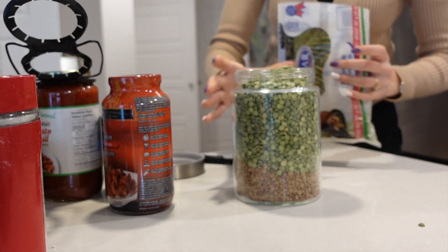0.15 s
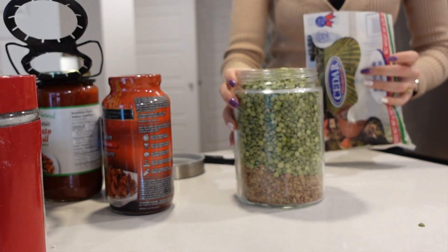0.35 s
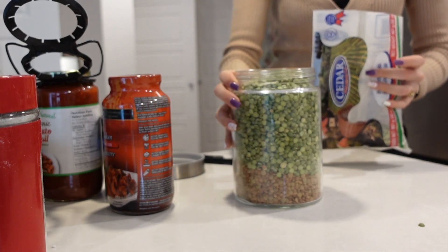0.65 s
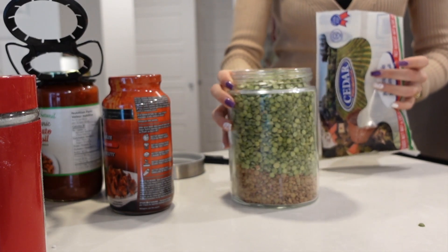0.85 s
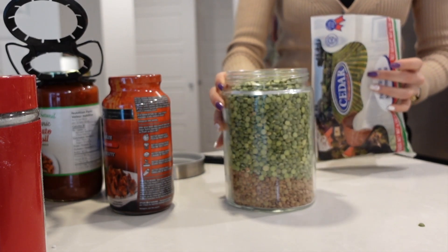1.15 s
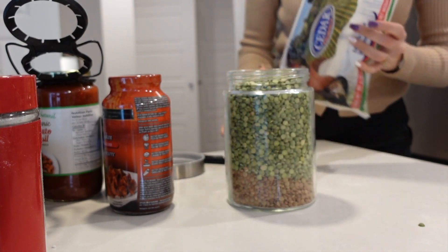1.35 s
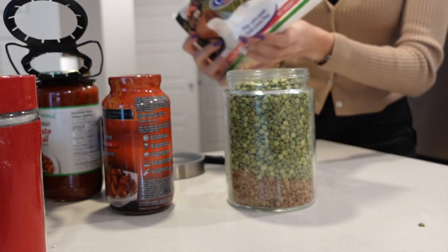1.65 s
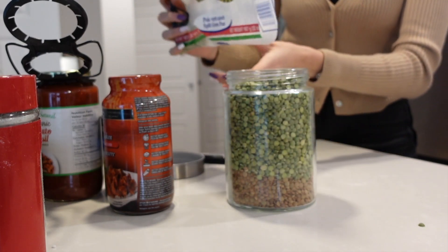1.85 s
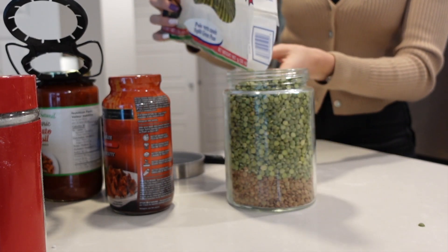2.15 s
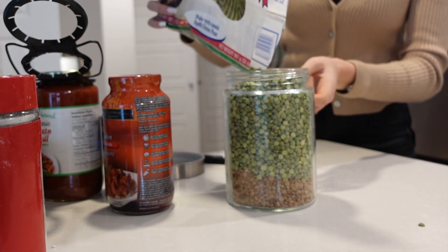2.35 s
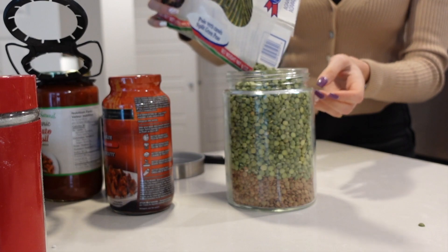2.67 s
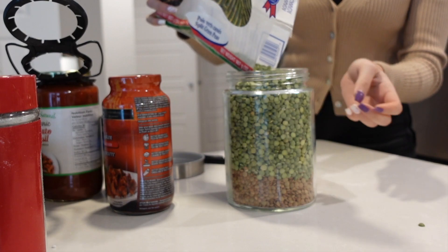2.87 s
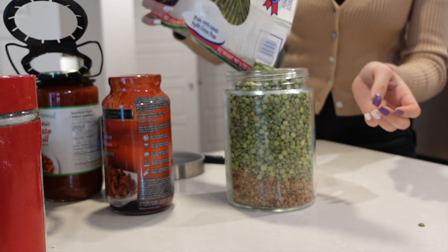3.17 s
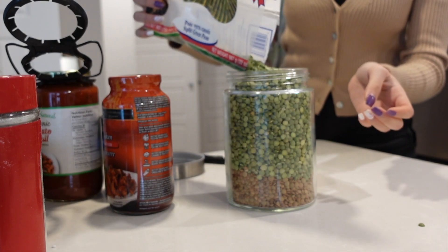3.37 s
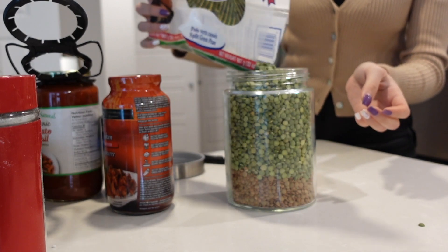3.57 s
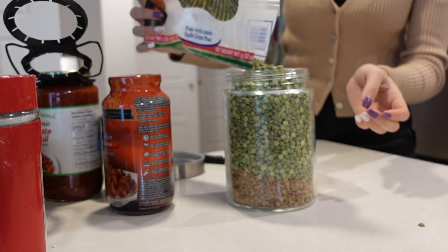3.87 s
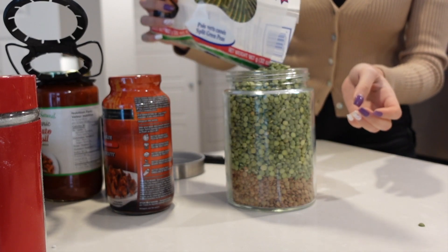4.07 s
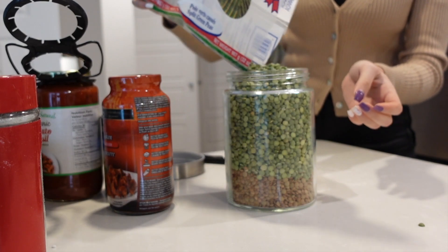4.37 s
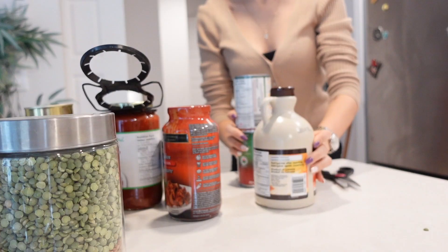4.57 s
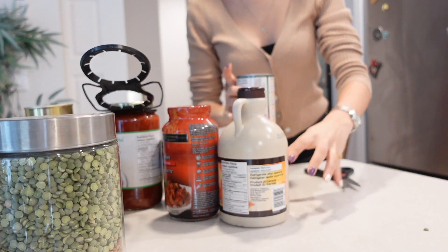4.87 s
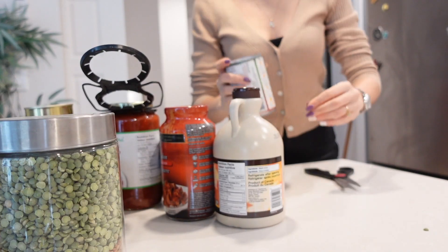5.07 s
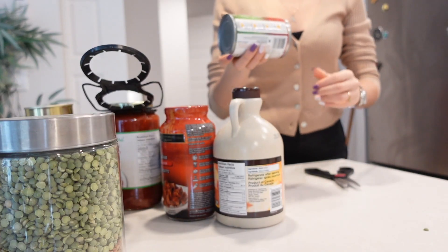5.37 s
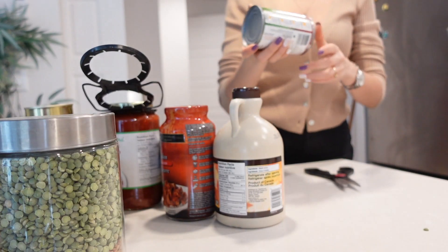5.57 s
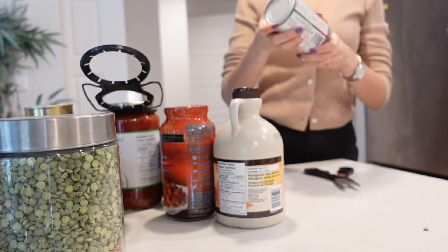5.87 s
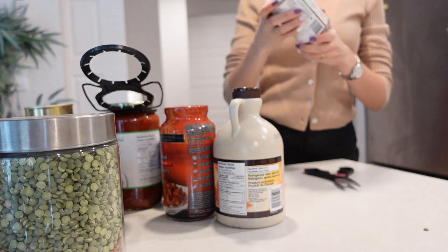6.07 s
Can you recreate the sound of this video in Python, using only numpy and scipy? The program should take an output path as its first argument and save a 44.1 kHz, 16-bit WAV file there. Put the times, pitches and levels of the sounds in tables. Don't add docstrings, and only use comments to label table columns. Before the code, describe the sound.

Glass jar clunks and grinds on a hard countertop, dried peas stream from a plastic bag in surges, then a jug bumps and a tin ticks.

```python
import sys
import numpy as np
from scipy import signal
from scipy.fft import rfft, irfft, next_fast_len
from scipy.io import wavfile
from scipy.ndimage import uniform_filter1d

SR = 44100
rng = np.random.default_rng(int(sys.argv[2]) if len(sys.argv) > 2 else 0)


def amp(db):
    return 10 ** (np.asarray(db, float) / 20)


def write(x):
    x = np.atleast_2d(x).T
    wavfile.write(sys.argv[1], SR, np.round(np.clip(x, -1, 1) * 32767).astype(np.int16))


N = 274743
TIME = np.arange(N) / SR
CHANGE_S = 4.599
FULL_DB = -27
PORT_LAG = .1

# pitch_hz, level_db
HUM_SPECTRUM = [(15, -45.5), (25, -27.5), (59, -18), (82, -8), (113, -5), (206, -2.5), (235, -2), (450, -7),
                (501, -7.5), (543, -10.5), (712, 3.5), (837, -12), (1070, -9), (3800, -26), (15900, -35)]
# pitch_hz, correlation
NOISE_LIKENESS = [(60, 0.8), (240, 0.53), (950, 0.11), (3770, 0.52), (15000, 0.98)]
# pitch_hz, t60_s
KITCHEN_DECAY = [(150, .45), (700, .45), (2500, .42), (6000, .38), (10000, .27), (15000, .18)]
# start_s, peak_db, centre_hz, bright_edge_db
RING_TICKS = [
    (5.6036, -22.5, 6000, -15.5),
    (5.608, -27.5, 6140, -12),
    (6.145, -28.5, 10600, 3),
]

# time_s, level_db
RUSTLE = [
    (4.6, -35.5),
    (4.66, -39.5),
    (4.9, -41),
    (4.968, -44),
    (5.03, -57),
    (5.1, -64.5),
    (5.35, -77),
]
# pitch_hz, level_db
RUB_SPECTRUM = [(180, -63), (300, -0.5), (582, -17), (711, -20), (772, -20), (839, -9), (2770, -3),
                (7740, -9.5), (15800, -30)]
# pitch_hz, level_db
THUD_SPECTRUM = [(15, -69), (25, -45), (70, -14), (156, -6), (195, -9), (372, -12), (479, -29.5),
                 (687, -15), (900, -22), (1700, -13), (2300, -60)]
# start_s, peak_db, pitch_hz, t60_s
HEEL_THUMPS = [(4.602, -25, 135, 0.043), (4.613, -25, 120, .04), (4.621, -29, 703, 0.048),
               (4.606, -36, 330, .04), (4.624, -29, 300, 0.04), (4.633, -27, 175, 0.051),
               (4.645, -33, 362, 0.045), (4.664, -42, 700, .03), (4.672, -36, 150, .04),
               (4.705, -40, 290, .04), (4.727, -44, 330, .04)]
# start_s, peak_db, centre_hz, bright_edge_db
SCUFFS = [(4.6022, -16, 3670, -28), (4.6224, -15, 3420, -23), (4.6525, -24, 4000, -20),
          (4.834, -32, 2800, -15), (4.9405, -25, 4400, -27), (4.7, -29, 3500, -8), (4.763, -26, 4140, -4),
          (4.778, -38, 3800, -9), (4.944, -18.5, 2770, -19), (4.9555, -15.5, 4800, -3),
          (4.959, -9.5, 2760, -23), (4.9875, -20, 2960, -25)]
# start_s, peak_db, pitch_hz, chatter_t60_s
JUG_BUMPS = [(4.943, -18, 840, 0.049), (4.948, -13.5, 700, 0.043), (4.963, -15, 760, .03),
             (4.967, -7.5, 997, 0.037), (4.972, -9.5, 1157, 0.02), (4.9865, -6, 710, 0.043),
             (4.9905, -8.5, 1075, 0.04), (4.996, -13, 635, 0.035), (5.002, -9.5, 737, 0.038),
             (5.006, -11, 1033, 0.057), (5.013, -17, 790, 0.31), (5.038, -26, 900, .05),
             (5.047, -24, 606, 0.044)]
# pitch_hz, level_db
JUG_CONTACT = [(24, -75), (40, -13), (218, 5), (576, 5), (677, -27), (845, -27), (1120, -15), (1320, -1),
               (5000, -27), (6500, -79), (11000, -120)]
# pitch_hz, width_hz, level_db
JUG_BODY = [(235, 32, -5), (292, 100, -15), (390, 42, 4.5), (650, 120, 6), (517, 100, -3), (900, 98, -11),
            (1100, 38, 4.5), (1390, 90, -28), (2300, 220, -4)]
# start_s, level_db
JUG_CHIMES = [
    (5.016, -26),
]
# pitch_hz, level_db, t60_s
JUG_WALL = [(1785, 7, 0.13), (7100, -34, .25), (7671, -30, 0.16)]

# time_s, contact_db
ROCKING = [(0.2, -62), (0.256, -55), (0.35, -41.5), (0.41, -32.5), (0.53, -39.5), (0.59, -45),
           (0.64, -25.5), (0.706, -26), (0.77, -36.5), (0.876, -19), (0.956, -29), (1.01, -31.5),
           (1.1, -34.5), (1.14, -33.5), (1.206, -46.5), (1.39, -53.5), (1.47, -71.5)]
# start_s, peak_db, pitch_hz, chatter_t60_s
LANDINGS = [(0.022, -14, 1150, 0.035), (0.081, -13.5, 955, 0.022), (0.246, -27.5, 940, 0.028),
            (0.276, -30, 940, 0.027), (0.363, -4, 750, 0.088), (0.369, -15.5, 950, .05),
            (0.377, -11.5, 900, 0.058), (0.384, -15.5, 624, 0.56), (0.398, -16.5, 590, 0.12),
            (0.437, -24, 1020, .04), (0.462, -18, 610, .04), (0.45, -11.5, 810, 0.033),
            (0.455, -18.5, 840, .03), (0.499, -27, 888, .04), (0.549, -15.5, 700, 0.04),
            (0.554, -18, 860, 0.033), (0.567, -26, 595, 0.027), (0.632, -3, 745, 0.07),
            (0.641, -11.5, 805, 0.034), (0.645, -7.5, 578, 0.05), (0.655, -9, 1030, 0.17),
            (0.667, -14.5, 610, 0.068), (0.692, -23, 1040, .06), (0.707, -17, 1100, 0.075),
            (0.719, -20.5, 810, .05), (0.737, -19, 950, .06), (0.751, -13, 715, 0.029),
            (0.756, -15.5, 800, 0.026), (0.762, -18, 547, .04), (0.804, -26, 837, .04),
            (0.838, -0.5, 796, 0.036), (0.851, -9, 810, 0.16), (0.863, -16, 780, 0.083),
            (0.879, -13, 870, 0.18), (0.895, -14.5, 840, 0.065), (0.954, -16.5, 830, 0.05),
            (0.960, -17, 800, .03), (0.965, -18, 804, .03), (1.017, -3, 783, 0.02),
            (1.030, -8.5, 880, 0.042), (1.039, -18.5, 603, 0.056), (1.052, -16, 806, 0.055),
            (1.229, -17.5, 775, 0.11), (1.243, -18.5, 834, 0.031), (1.299, -34, 775, 0.1),
            (1.331, -29.5, 790, 0.046), (1.379, -32, 815, 0.2)]
# start_s, peak_db, pitch_hz,
# chatter_t60_s
ROLLS = [(0.340, -18, 780, 0.036), (0.350, -14, 807, .03), (0.522, -19.5, 740, .04), (0.533, -21, 786, .04),
         (0.614, -21, 780, 0.036), (0.623, -23, 810, .04), (0.818, -21, 830, .04), (0.935, -12.5, 830, .05),
         (1.118, -20, 880, .06), (1.127, -24, 815, .08), (1.994, -21, 788, 0.043), (3.6, -37.5, 397, .04)]
# start_s, peak_db, pitch_hz, chatter_t60_s
RIM_BUMPS = [
    (1.668, -20, 890, 0.054),
]
# pitch_hz, level_db
JAR_CONTACT = [(35, -75.5), (60, -42), (279, -12.5), (584, 2), (653, -25), (771, -12), (1140, -5),
               (3720, -22.5), (4310, -25), (5000, -30), (6500, -65), (11000, -120)]
# pitch_hz, width_hz, level_db
JAR_BODY = [(84, 38, -23.5), (137, 21, -27), (227.7, 31, -12), (359.6, 37.2, -5.5), (380, 35, -12.5),
            (541, 150, -0.5), (688, 35, -13.5), (825, 160, -10), (924, 81, -4), (1120, 66, -6),
            (1285, 80, -8.5), (1660, 120, -15), (1980, 33, -36.5)]
# pitch_hz, width_hz, level_db
RIM_TONES = [(2000, 120, -1.5), (2800, 160, 1), (3410, 200, -14)]
# start_s, level_db
NECK_CHIMES = [
    (0.639, -27),
    (0.847, -22.5),
]
# pitch_hz, level_db, t60_s
NECK = [(4242, -7, 0.23), (4310, -20, 0.1), (3467, -18, 0.083)]
# start_s, peak_db, centre_hz, bright_edge_db
CLACKS = [(0.3632, -19.5, 2300, -23), (0.45, -31, 2520, -22), (0.533, -45, 6500, -8),
          (0.5493, -36, 2790, -22), (0.626, -40, 8000, 0), (0.6331, -18, 3200, -30), (0.7493, -36, 5900, 0),
          (0.768, -34, 6000, -1), (0.7937, -34, 5930, -4), (0.797, -30, 6000, 2), (0.806, -37, 6000, -4),
          (0.814, -37, 6000, -8), (0.834, -40, 6000, 0), (0.8381, -13.5, 3270, -20),
          (0.872, -26, 2800, -25), (0.911, -36, 6000, -4), (0.917, -39, 6000, -3), (0.941, -43, 6000, 0),
          (1.0162, -23.5, 2800, -28), (1.052, -33, 2200, -25), (1.13, -35, 3000, -20)]

# full_from_s, full_until_s, first_flow_db, last_flow_db, swell_db_per_s
SURGES = [(0.0, 0.15, -24, -33.5, 200), (1.386, 1.384, -43, -45, 3000), (1.423, 1.46, -48, -45.5, 204),
          (1.502, 1.564, -45, -53.5, 200), (1.595, 1.65, -37, -40, 1500), (1.664, 1.775, -30.5, -43.5, 308),
          (1.841, 2.07, -37, -25.5, 160), (2.12, 2.494, -26, -28.5, 191), (2.5, 2.91, -26, -29, 202),
          (2.92, 2.98, -28.5, -32.5, 200), (3.01, 3.18, -33.5, -27.5, 48), (3.131, 3.23, -27, -30.5, 209),
          (3.251, 3.466, -33.5, -44, 200), (3.55, 3.566, -47, -42, 197), (3.584, 3.663, -37.5, -35.5, 1999),
          (3.697, 3.74, -31.5, -29, 104), (3.85, 3.98, -55, -50, 200), (3.994, 4.066, -41.5, -40, 1998),
          (4.095, 4.1, -35, -29.5, 223), (4.158, 4.2, -29, -34.5, 195.5), (4.22, 4.1, -42, -45, 200),
          (4.344, 4.41, -30, -26.5, 198), (4.396, 4.5, -27, -30.5, 196), (4.469, 4.56, -33, -29, 203.5),
          (4.533, 4.66, -29.5, -26.5, 200)]
# time_s, heap_thud_rel_flow_db
DROP = [
    (0.0, 2),
    (1.7, -4),
    (1.85, -11.5),
    (2.1, -5.5),
    (2.4, -12),
    (3.3, -9.5),
    (3.6, -16),
    (4.2, -20),
    (4.4, -14),
    (4.66, -10),
]
# pitch_hz, level_db
PEA_SPECTRUM = [(120, -55), (200, -21.5), (527, -13), (656, -7), (1340, -6), (2320, -1), (3660, -5.5),
                (4900, -6.5), (11400, -16.5), (15800, -3)]
# pitch_hz, width_hz, level_db
PEA_TONES = [(2005, 530, -6), (1967, 250, -4), (2505, 630, 3.5), (2790, 550, -2.5), (3200, 250, -5.5),
             (4050, 240, -6), (4730, 340, -2.5), (5230, 490, -11), (6230, 740, -9)]
# time_s, pitch_hz
MOUTH = [(0.0, 2310), (0.11, 2100), (0.26, 2400), (0.32, 1823), (1.4, 2010), (1.47, 2660), (1.63, 2300),
         (2.82, 2240), (2.95, 2110), (2.98, 2360), (3.75, 2570), (3.82, 2250), (3.91, 2500), (4.0, 1980),
         (4.06, 2560), (4.6, 2300)]
# start_s, peak_db, centre_hz, bright_edge_db
FILM_SNAPS = [(0.0199, -6, 2880, -34), (0.030, -11.5, 3500, -30), (0.105, -13.5, 3200, -20),
              (0.109, -12, 5030, -17), (0.2274, -7.5, 2500, -27), (0.2444, -15, 1490, -32),
              (1.245, -32.5, 3200, -20), (1.3795, -32.5, 2190, -21), (1.388, -33, 1900, -25),
              (1.299, -31.5, 2560, -21.5), (1.3533, -39.5, 4980, -20), (1.4232, -19.5, 2120, -37.5),
              (1.5728, -35, 2670, -24), (1.5874, -27, 3470, -20), (1.5993, -22.5, 2300, -16),
              (1.621, -27.5, 2900, -42), (1.6503, -18, 2190, -27), (1.6644, -3, 2800, -11),
              (1.6684, -5.5, 2560, -20), (2.102, -11.5, 2340, 0), (2.144, -12.5, 2420, -10),
              (1.996, -17, 2520, -20), (2.952, -19, 2030, -20), (3.005, -20, 2380, -22),
              (3.12, -18.5, 2420, -18), (3.395, -31, 2250, -20), (3.43, -28, 2880, -20)]
# start_s, peak_db, centre_hz, bright_edge_db
STRAYS = [(3.462, -32, 2700, -25), (3.540, -32.5, 2300, -25), (3.5735, -19.5, 4000, -12),
          (3.575, -31, 2500, -25), (3.603, -27, 4000, -20), (3.6155, -21, 3800, -22),
          (3.636, -24, 4400, -15), (3.6713, -22, 2650, -18), (3.7904, -24, 2020, -21),
          (3.878, -39, 2730, -10), (3.94, -40, 2500, -6), (3.9669, -37, 3000, 2), (3.991, -27, 4000, -18),
          (4.0012, -29, 2110, -24), (4.0467, -29, 2760, -18), (4.4744, -19, 2460, -25),
          (4.475, -23, 4913, -20), (4.442, -27, 4900, -25), (4.24, -30, 2600, -25)]


def evened(x):
    return x / np.sqrt(np.mean(x ** 2) + 1e-20)


def read(points, hz):
    f, value = np.transpose(points)
    return np.interp(np.log(hz + 1), np.log(f + 1), value)


def curves(rows):
    s, db = np.transpose(rows)
    return np.interp(TIME, s, db, -150, -150)


def colour(x, points):
    hz = abs(np.fft.fftfreq(8192, 1 / SR))
    log_gain = np.log(amp(np.maximum(read(points, hz), -90)))
    taps = np.fft.ifft(np.exp(np.conj(signal.hilbert(log_gain)))).real[:3000]
    return signal.oaconvolve(x, taps)[:len(x)]


def band(x, lo_hz, hi_hz):
    sos = signal.butter(3, [lo_hz, hi_hz], "band", fs=SR, output="sos")
    return evened(signal.sosfilt(sos, x + 1e-18))


def high_pass(x, order, hz):
    return signal.sosfilt(signal.butter(order, hz, "high", fs=SR, output="sos"), x)


def ring(x, modes):
    out = np.zeros(len(x))
    for hz, width, db in modes:
        r = np.exp(-np.pi * width / SR)
        poles = [1, -2 * r * np.cos(2 * np.pi * hz / SR), r * r]
        out += amp(db) * evened(signal.lfilter([1, 0, -1], poles, x))
    return out


def glide(x, hz, width):
    turn = np.exp(2j * np.pi * np.cumsum(hz) / SR)
    r = np.exp(-np.pi * width / SR)
    return evened((turn * signal.lfilter([1 - r], [1, -r], x / turn)).real)


def clicks(per_s, spread_db):
    chance, sign, size = rng.random(N), rng.standard_normal(N), rng.exponential(1, N)
    odds = per_s / SR
    return evened((chance < odds) * sign * amp(spread_db * np.minimum(size, 4)) / np.sqrt(odds))


def wander(depth_db, per_s):
    steps = rng.standard_normal(400)
    return amp(depth_db * np.interp(TIME * per_s, np.arange(len(steps)), steps))


def add(mix, s, sound):
    part = mix[round(s * SR):][:len(sound)]
    part += sound[:len(part)]


def hum():
    size = next_fast_len(N)
    left, other = (evened(colour(v, HUM_SPECTRUM)) for v in rng.standard_normal((2, size)))
    same = read(NOISE_LIKENESS, np.fft.rfftfreq(size, 1 / SR))
    right = irfft(same * rfft(left) + np.sqrt(1 - same ** 2) * rfft(other), size)
    return amp(-55.5) * np.array([left, right])[:, :N]


def kitchen(x, wet_db, apart=.3):
    taps = np.zeros((2, SR // 2))
    starts = np.arange(160, SR // 2 - 20, 20)
    at = starts + rng.integers(0, 20, (2, len(starts)))
    np.put_along_axis(taps, at, rng.choice([-1., 1.], at.shape), 1)
    hz, t, z = signal.stft(taps, SR, nperseg=256)
    decay = amp(-60 * t / read(KITCHEN_DECAY, hz)[:, None])
    mid, side = signal.istft(z * decay, SR, nperseg=256)[1]
    tail = np.array([mid + apart * side, mid - apart * side]) / np.linalg.norm(mid)
    return amp(wet_db) * signal.oaconvolve(x[None], tail, axes=1)[:, :N]


def placed(x, pan_db, lag):
    slope = lag * np.gradient(x)
    return np.array([x + slope, x - slope]) * amp(np.array([[pan_db / 2], [-pan_db / 2]]))


def ticks(rows, low_db, t60, fray=0.66, spread=1.66, edge_hz=12500):
    out, t = np.zeros(N), np.arange(1500) / SR
    for (s, db, hz, top_db), noise in zip(rows, rng.standard_normal((len(rows), 1500))):
        snap = (t == 0) + fray * noise * amp(-60 * t / t60)
        crack = band(snap, hz / spread, hz * spread)
        crack += amp(low_db) * band(snap, 523, 1800)
        crack += amp(top_db) * band(snap, 6900, edge_hz)
        add(out, s + 0.000997, amp(db - 2.5) * crack / abs(crack).max())
    return out


def chimes(starts, modes):
    out, t = np.zeros(N), np.arange(SR // 2) / SR
    for s, db in starts:
        tones = np.zeros(len(t))
        for hz, rel_db, t60 in modes:
            tones += amp(db + rel_db - 60 * t / t60) * np.sin(2 * np.pi * hz * t)
        add(out, s, tones * (1 - np.exp(-t / 0.015)))
    return out


def knocks(rows, short, body, contacts_per_s, crack_db, chatter_db, rise_s=0.0018, grain=0.29):
    blows, shake, t = np.zeros(N), np.zeros(N), np.arange(SR // 4) / SR
    cracks = rng.standard_normal((len(rows), 400))
    for (s, db, hz, t60), crack in zip(rows, cracks):
        rise = 1 - np.exp(-(t / rise_s) ** 2)
        overtone = 0.98 * amp(-60 * t / 0.0099) * np.sin(2 * np.pi * 1.884 * hz * t)
        decay = amp(db + 9.5 - 60 * t / (0.0095 + 3.5 * rise_s))
        add(blows, s, decay * rise * (np.sin(2 * np.pi * hz * t) + overtone))

        snap = (t[:400] == 0) + 0.12 * crack * amp(-60 * t[:400] / 0.013)
        add(blows, s + .0008, amp(db + crack_db - 12.5) * band(snap, 1050, 4000))

        chatter_s = np.clip(t60, .03, .5)
        start_db = db + chatter_db - 3.5 * np.log2(chatter_s / 0.11)
        add(shake, s, amp(start_db - 60 * t / chatter_s) * (1 - np.exp(-(t / 0.0063) ** 2)))
    busy = slice(int(rows[0][0] * SR), int(rows[-1][0] * SR) + len(t))
    contacts = clicks(contacts_per_s, 0.88)[busy]
    modes = band(ring(contacts, body), 70, 2140)
    shake[busy] *= evened(modes + grain * evened(colour(contacts, short)))
    return high_pass(blows + 1e-18, 2, 110) + shake


def tin_ring():
    return ticks(RING_TICKS, low_db=-47.5, t60=0.011, fray=0.042, edge_hz=17300)


def thumps():
    out, t = np.zeros(N), np.arange(SR // 8) / SR
    for s, db, hz, t60 in HEEL_THUMPS:
        rise = 1 - np.exp(-t / 0.0019)
        add(out, s, amp(db + 4 - 60 * t / t60) * rise * np.sin(2 * np.pi * hz * t))
    return out


def label_rustle():
    rub = amp(curves(RUSTLE))
    grains = clicks(5000, 0.56)
    label = evened(colour(grains, RUB_SPECTRUM))
    for fold in [(2750, 550, -8.5), (4080, 500, -9.0), (7560, 1100, -13)]:  # Hz, width Hz, dB
        label = label + wander(3.0, per_s=27) * ring(grains, [fold])
    rustle = rub * band(label, 305, 5000) + rub * amp(-11) * band(label, 6900, 20000)
    fidget = amp(evened(uniform_filter1d(grains, size=900)))
    return fidget * rustle


def counter_thud():
    fall_db = -40.5 - 200 * np.maximum(TIME - CHANGE_S - 0.03, 0)
    noise = evened(colour(rng.standard_normal(N), THUD_SPECTRUM))
    return wander(3.8, per_s=55) * amp(fall_db) * noise


def jug():
    landed = knocks(JUG_BUMPS, JUG_CONTACT, JUG_BODY, 4000, crack_db=-21.5, chatter_db=-9)
    scuffs = ticks(SCUFFS, low_db=-1.5, t60=0.017)
    return label_rustle() + counter_thud() + thumps() + chimes(JUG_CHIMES, JUG_WALL) + landed + scuffs


def jar_grind(press_db, shaken_db):
    grit = amp(-43 + press_db - FULL_DB)
    jostle = amp(-53 + 0.61 * (shaken_db - FULL_DB))
    s, _, hz, _ = np.transpose(LANDINGS)
    bumps = clicks(3000, 1.36)
    moving = glide(bumps, np.interp(TIME, s, hz), 96)
    grind = band(.7 * evened(ring(bumps, JAR_BODY)) + moving, 382, 1400)
    boom = amp(-40.5 + 0.43 * (shaken_db - FULL_DB)) * band(ring(bumps, JAR_BODY[:4]), 59, 416)

    scrape = clicks(6000, 3.3)
    rasp = 0.77 * band(colour(scrape, JAR_CONTACT), 1602, 3470) + amp(-4.5) * ring(scrape, RIM_TONES)

    walls = np.zeros(N)
    for wall in [(4300, 1500, -8), (6000, 360, -1.5), (7800, 2000, -5.5), (10600, 1810, -7)]:
        walls += wander(2.13, per_s=30) * ring(clicks(2400, 3.0), [wall])
    return amp(press_db) * grind + grit * rasp + jostle * band(walls, 3200, 13700) + boom


def jar():
    press_db = curves(ROCKING)
    power = uniform_filter1d(amp(2 * press_db), size=int(0.046 * SR))
    shaken_db = 10 * np.log10(abs(power) + 1e-15)
    landed = knocks(LANDINGS, JAR_CONTACT, JAR_BODY, 4000, crack_db=-25, chatter_db=-9)
    rolled = knocks(ROLLS, JAR_CONTACT, JAR_BODY, 4000, crack_db=-39, chatter_db=-11,
                    rise_s=0.0054, grain=0.2)
    rim = knocks(RIM_BUMPS, JAR_CONTACT, JAR_BODY, 1700, crack_db=8.5, chatter_db=-7.0)
    return jar_grind(press_db, shaken_db) + chimes(NECK_CHIMES, NECK) + landed + rolled + rim


def flow_db():
    surges = []
    for a, b, first, last, swell in SURGES:
        level = np.interp(TIME, [a, max(b, a)], [first, last])
        level -= swell * np.maximum(a - TIME, 0)
        level -= 240 * np.maximum(TIME - b, 0)
        level -= 2.5 * np.clip((TIME - b) / 0.004, 0, 1)
        surges.append(level)
    return np.max(surges, axis=0)


def peas():
    db = flow_db()
    flow = amp(db)
    film_slope = 1.21
    over_db = film_slope * (db - FULL_DB)
    thud = amp(db + np.interp(TIME, *np.transpose(DROP)))
    fizz = amp(-36.5 + over_db - 3.5 * (TIME < 1.8))
    rattle = amp(db - 16.5 + over_db / 2)

    per_s, spread_db = 8000 * np.clip(flow / amp(-30.5), .4, 1), 1.6
    heap, blunt, film = (colour(clicks(many * per_s, spread_db), PEA_SPECTRUM) for many in (1, 1.3, 2.5))
    hits = clicks(1.4 * per_s, spread_db)
    which = rng.integers(0, len(PEA_TONES), N)
    tones = np.zeros(N)
    for k, tone in enumerate(PEA_TONES):
        tones += wander(2.5, per_s=16) * ring(hits * (which == k), [tone])
    mouth = glide(hits, np.interp(TIME, *np.transpose(MOUTH)), 700)
    body = band(tones, 1810, 7000) + 0.7 * band(blunt, 1500, 8800) + amp(-4) * band(mouth, 1540, 3700)

    clumps = amp(0.41 * evened(uniform_filter1d(rng.standard_normal(N), size=500)))
    out = flow * clumps * evened(body) + thud * band(heap, 249.6, 1790)
    return out + fizz * band(film, 7500, 12280) + rattle * band(blunt, 4200, 6870)


def scene():
    rock, pour = jar(), peas()
    tick = ticks(FILM_SNAPS, low_db=-7.0, t60=0.021, fray=0.14)
    tick += ticks(STRAYS, low_db=-17, t60=0.014, spread=1.28)
    clack = ticks(CLACKS, low_db=-20, t60=0.012, fray=0.47, spread=1.4)
    first = placed(rock, -2.09, lag=.07) + kitchen(rock, -12.5, apart=0.36)
    first += placed(pour + tick, -0.342, lag=PORT_LAG) + kitchen(pour + 1.07 * tick, -12, apart=0.13)
    first += placed(clack, -0.6, lag=PORT_LAG) + kitchen(clack, -15, apart=0.2)

    later = TIME > CHANGE_S
    handled, tin = jug() * later, tin_ring()
    far_tin = np.std(tin) * band(tin, 4250, 7500)
    second = placed(handled, -1.0, lag=PORT_LAG) + placed(tin, 2.6, lag=0.06)
    second += kitchen(handled + 0.75 * far_tin + 2.0 * tin, -12.0, apart=0.2)

    fade = np.clip(abs(TIME - CHANGE_S) / 0.0043, 0, 1)
    return (np.where(later, second, first) + hum()) * fade


def top_cut(x):
    return signal.sosfilt(signal.butter(12, 16670, fs=SR, output="sos"), x)


def record(dry):
    cut = high_pass(dry, 4, 58)
    low_pass = signal.firwin(511, 15780, window=("kaiser", 5), fs=SR)
    cut = signal.oaconvolve(cut, low_pass[None], "same")
    held = cut / (1 + abs(cut / .9) ** 4) ** .25
    return top_cut(high_pass(held, 2, 45))


dry = scene()
out = record(dry)
write(out)
```